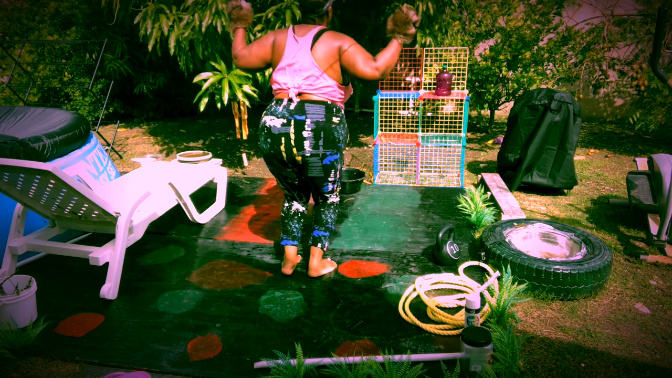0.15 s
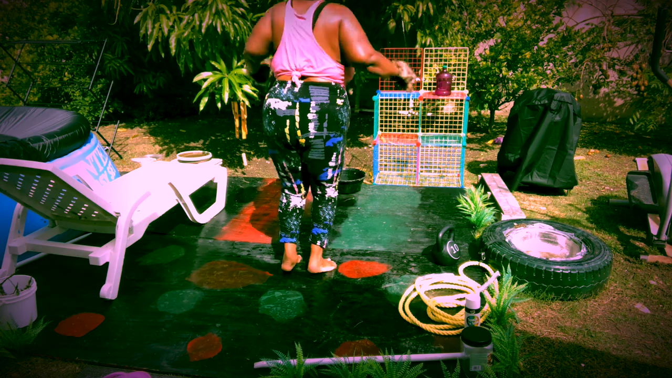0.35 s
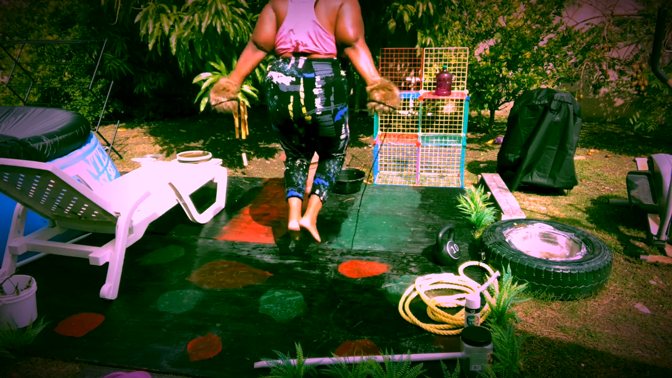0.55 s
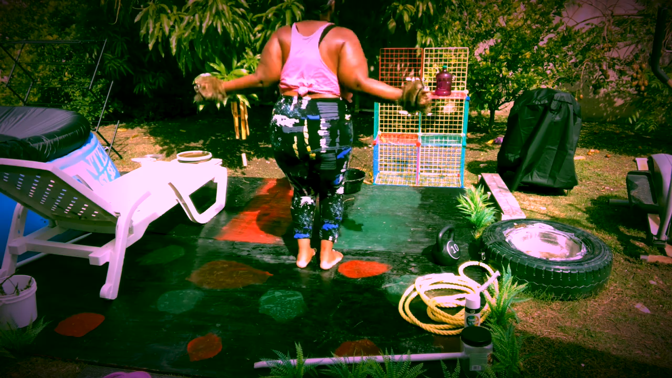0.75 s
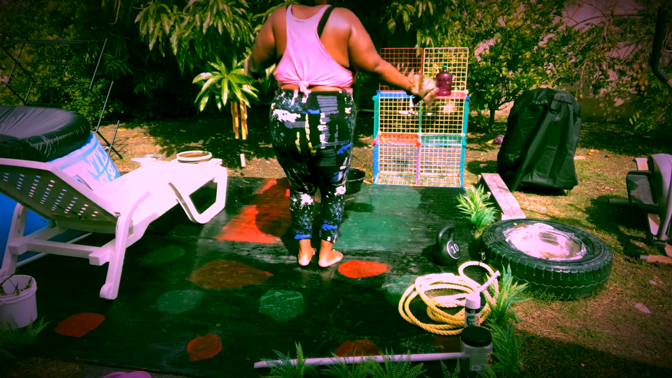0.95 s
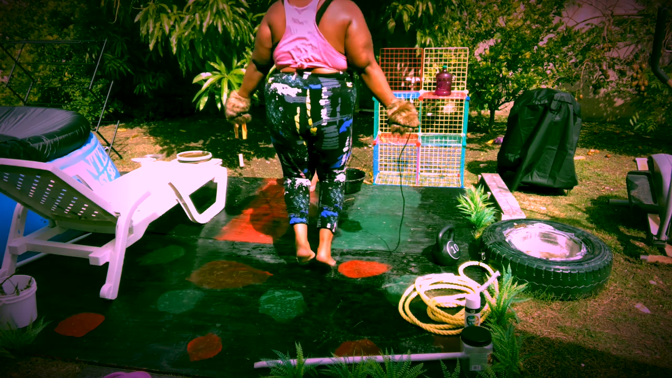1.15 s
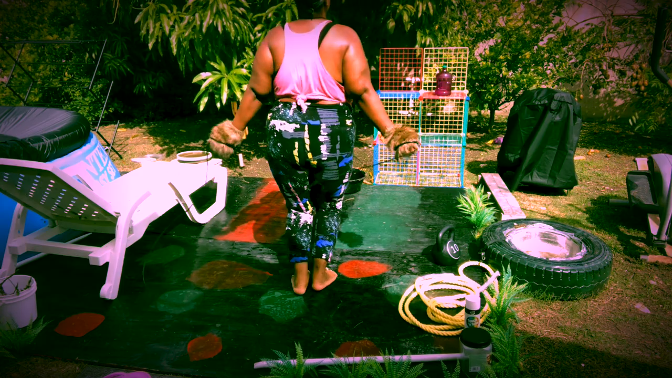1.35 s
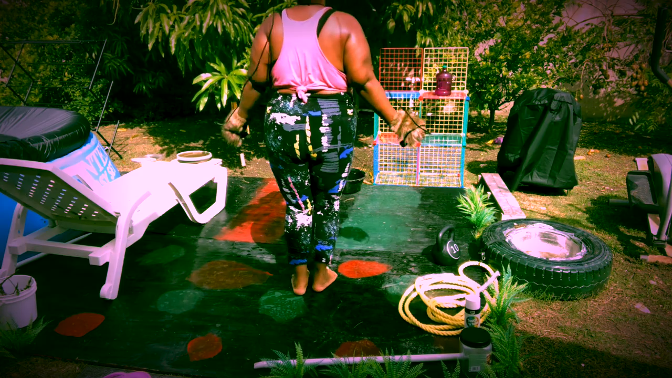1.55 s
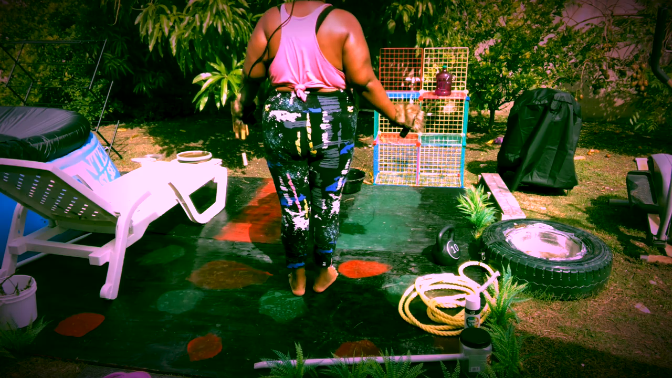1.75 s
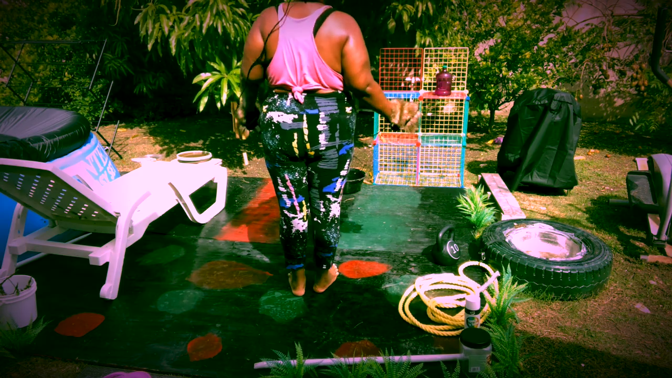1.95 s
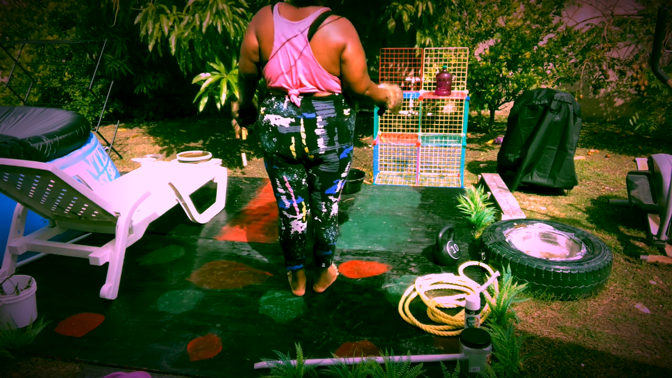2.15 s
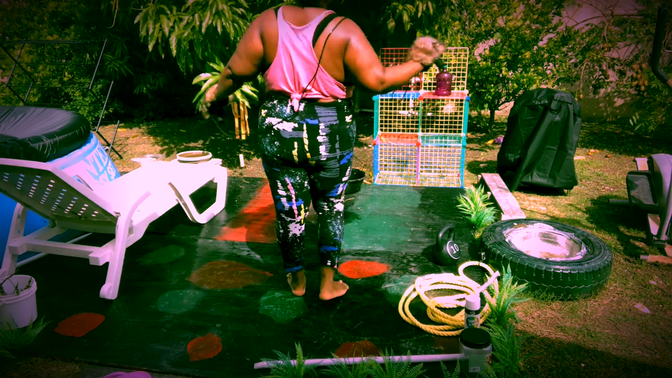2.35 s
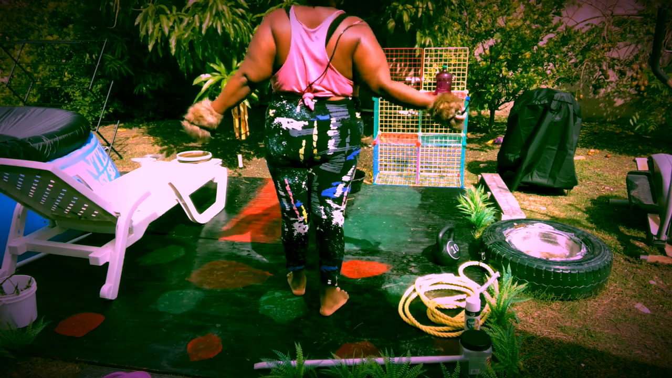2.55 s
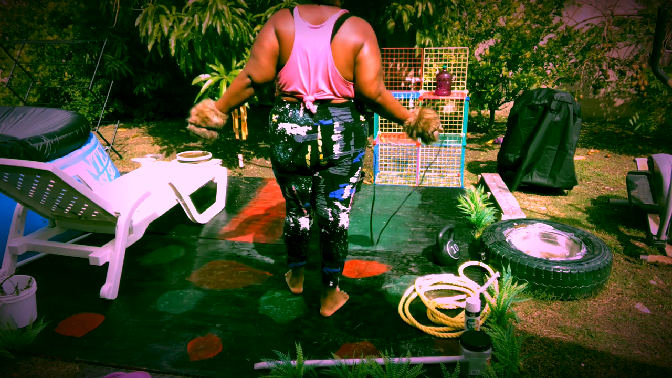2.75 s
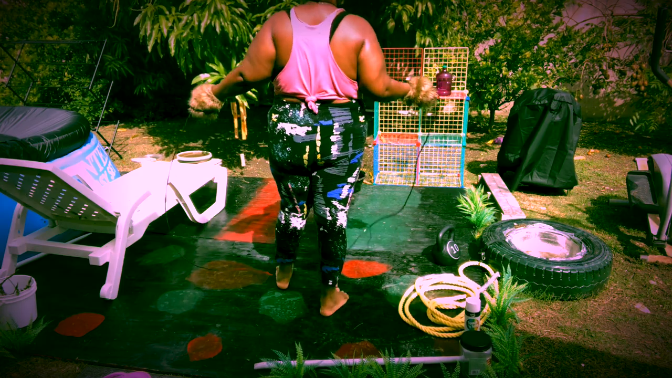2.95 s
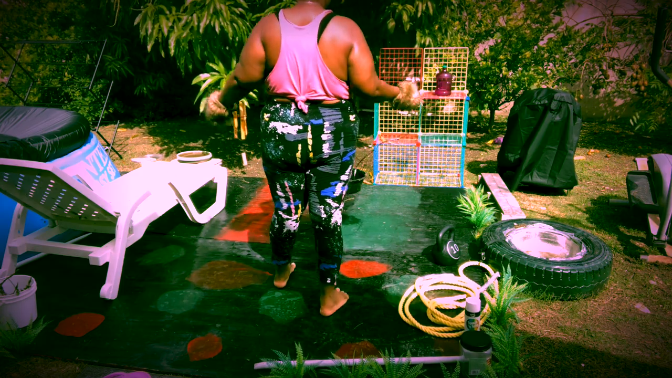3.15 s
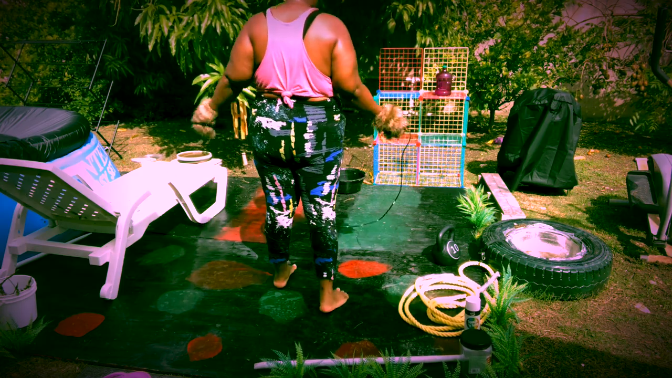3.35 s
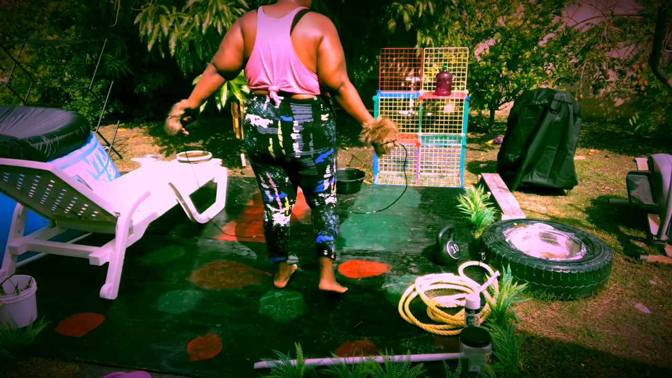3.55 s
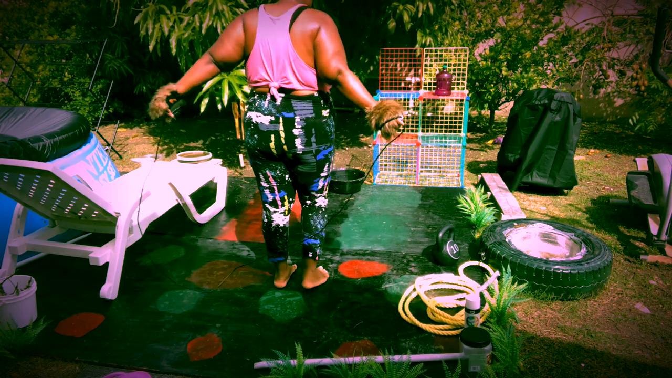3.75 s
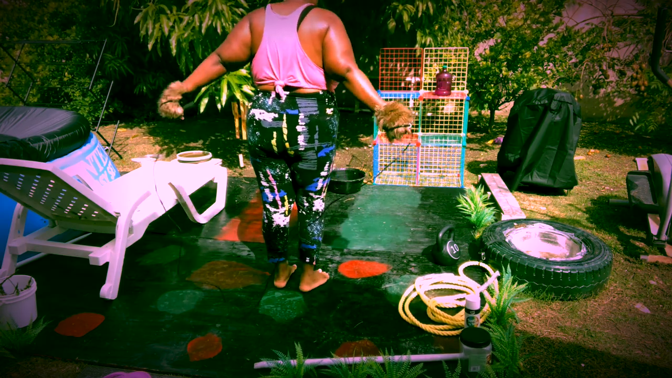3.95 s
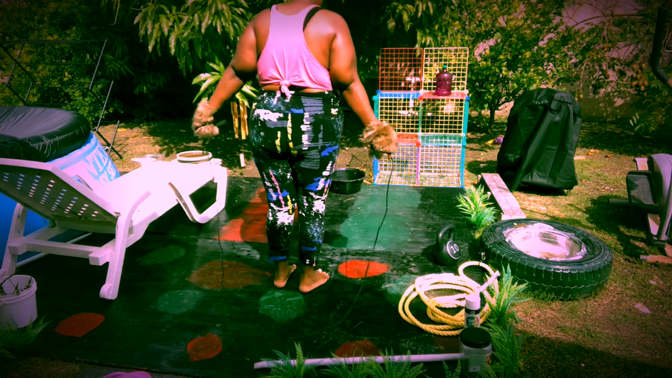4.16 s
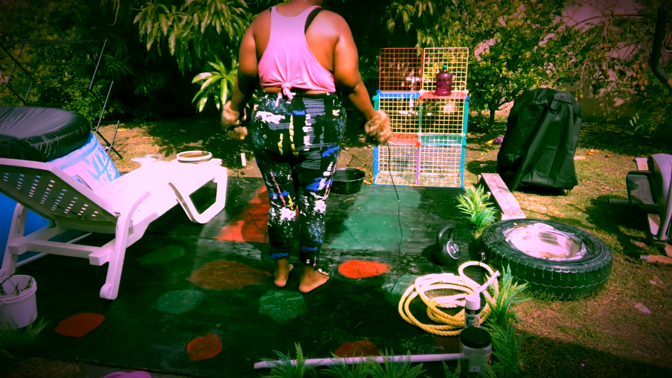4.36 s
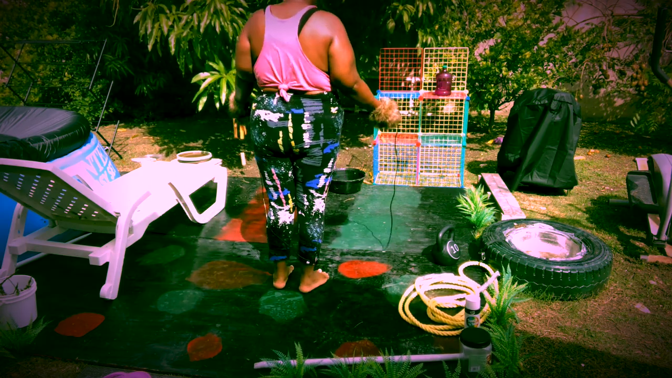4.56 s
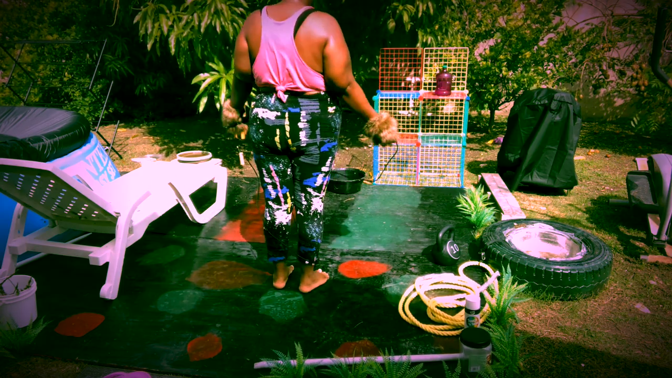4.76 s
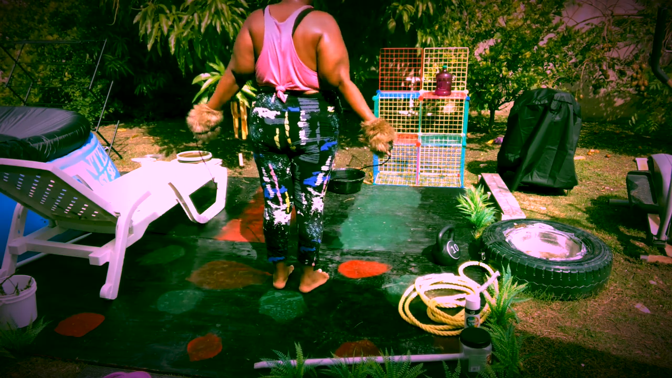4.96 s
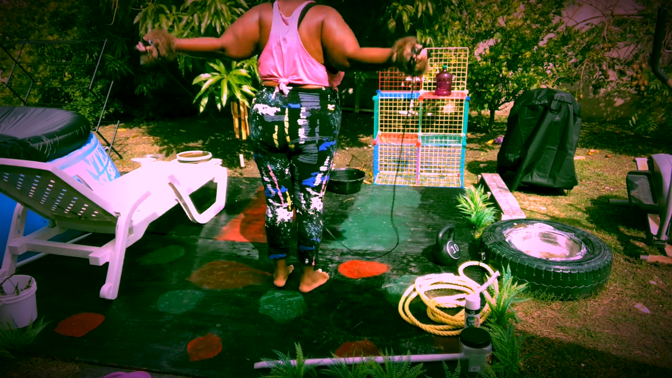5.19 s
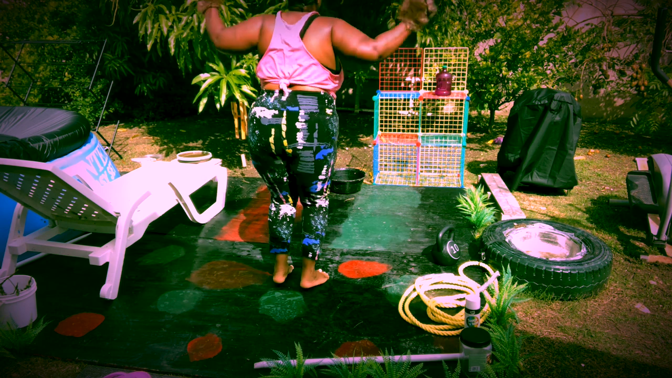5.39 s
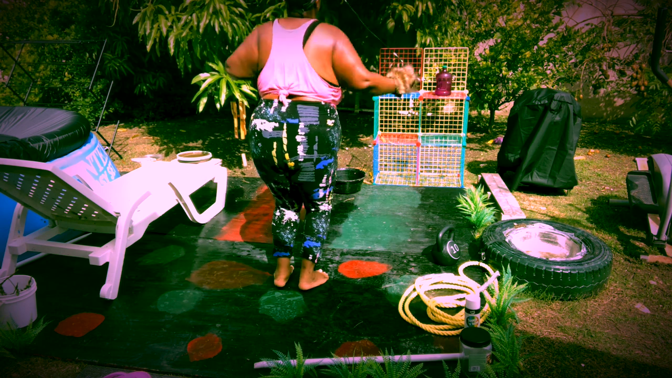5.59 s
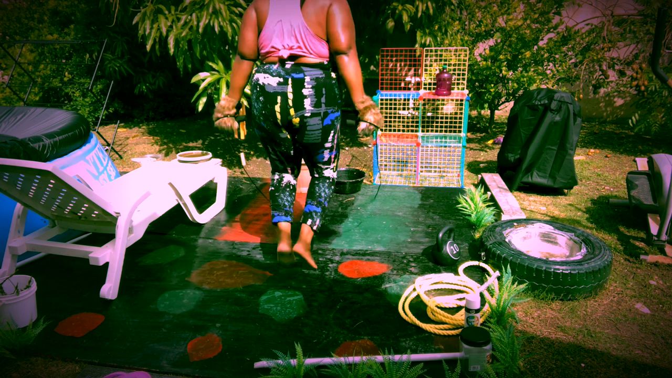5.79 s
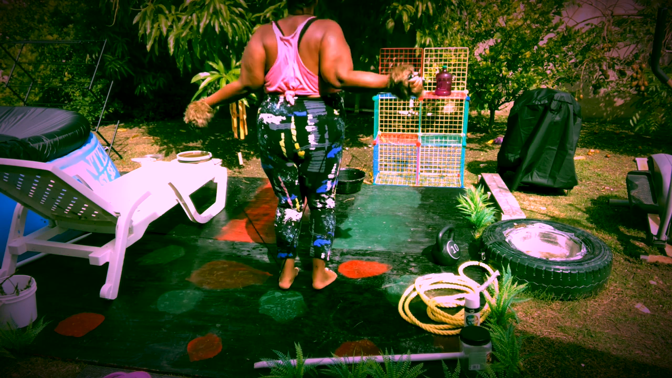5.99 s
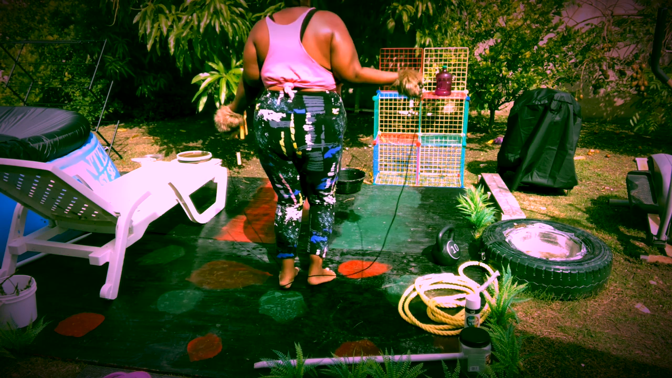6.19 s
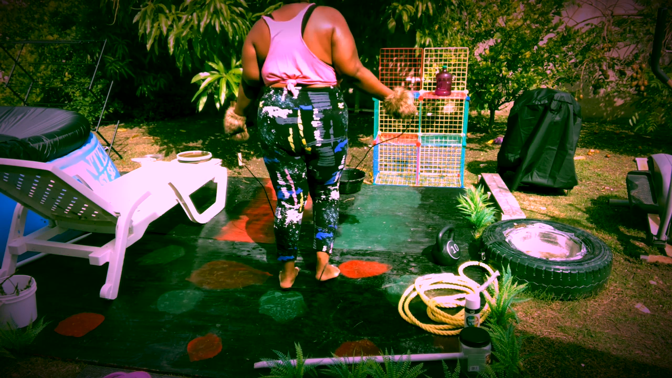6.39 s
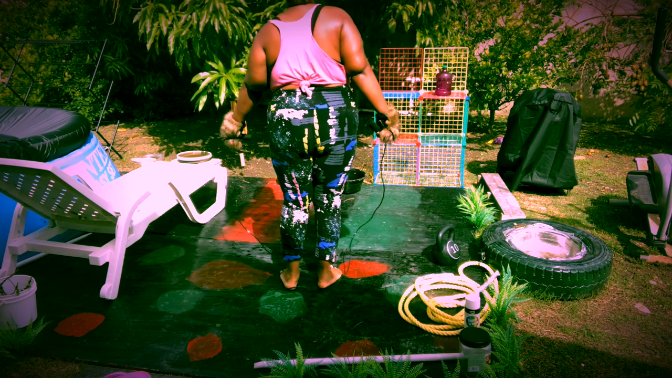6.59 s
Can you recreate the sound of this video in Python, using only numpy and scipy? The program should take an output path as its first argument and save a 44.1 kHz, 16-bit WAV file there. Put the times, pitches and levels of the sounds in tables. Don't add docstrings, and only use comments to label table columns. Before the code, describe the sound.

A thin rope cracks sharply on a wet garden mat while bare feet land with hollow knocks and rattles, over low traffic and leaves.

```python
import sys
import numpy as np
from scipy import signal
from scipy.io import wavfile
from scipy.ndimage import uniform_filter1d

SR = 44100
rng = np.random.default_rng(int(sys.argv[2]) if len(sys.argv) > 2 else 0)


def store_wav(level_fs):
    pcm = np.round(np.clip(np.atleast_2d(level_fs), -1, 1) * 32767)
    wavfile.write(sys.argv[1], SR, pcm.T.astype(np.int16))


def volts(x):
    e = np.asarray(x, float) / 20
    return 10 ** e


N = 292383


def evened(x):
    return x / np.sqrt(np.mean(x ** 2) + 1e-20)


def read(points, hz):
    f, value = np.transpose(points)
    return np.interp(np.log(hz + 1), np.log(f + 1), value)


def add(mix, s, sound):
    part = mix[round(s * SR):][:len(sound)]
    part += sound[:len(part)]


def colour(points):
    level_db = read(points, abs(np.fft.fftfreq(4096, 1 / SR)))
    log_gain = np.log(volts(np.maximum(level_db, -100)))
    return np.fft.ifft(np.exp(signal.hilbert(log_gain).conj())).real[:2048]


def tinted(x, points):
    return evened(signal.oaconvolve(x, colour(points))[:len(x)])


def resonate(x, hz, width_hz):
    turn = np.exp(2j * np.pi * hz * np.arange(len(x)) / SR)
    r = np.exp(-np.pi * width_hz / SR)
    return 2 * (turn * signal.lfilter([1 - r], [1, -r], x / turn)).real


def grains(per_s, spread_db):
    spread = np.minimum(rng.exponential(1, N), 4)
    size = volts(spread_db * spread) * rng.standard_normal(N)
    return size * (rng.random(N) < per_s / SR)


def stroked(rows, main, second, dulling_db_per_s=0):
    out, t = np.zeros(N), np.arange(N) / SR
    for s, level_db, rise_s, fall_s, rel_db in rows:
        start = max(round((s - 2.5 * rise_s) * SR), 0)
        at = slice(start, round((s + 2.5 * fall_s) * SR))
        since_s = t[at] - s
        below_db = 20 * np.maximum(since_s / fall_s, -since_s / rise_s)
        layers = main[at] + volts(rel_db + dulling_db_per_s * since_s) * second[at]
        out[at] += volts(level_db - below_db) * layers
    return out


def jolted(rows):
    rise_s = 0.0047
    return [(s, db, rise_s, fall_s, rel_db) for s, db, fall_s, rel_db in rows]


def garden():
    # f/Hz, density/dB per Hz
    floor = [(15, -67), (25, -39), (38, -5), (58, -6), (80, -4), (127, -9.5), (258, -9), (338, -13),
             (521, -14.5), (741, -18), (999, -20), (2880, -28), (4090, -27), (15000, -48.5), (16300, -59)]
    # t/s, level/dB
    leaves = [(0.0, -56), (0.66, -54), (0.9, -60), (1.22, -55), (1.4, -57.5), (2.55, -56.5), (5.26, -59),
              (5.74, -57), (5.93, -45), (6.2, -65.5), (6.63, -54.5)]
    # t/s, level/dB
    motor = [(0.0, -63), (0.48, -33), (0.7, -59), (1.27, -54), (1.42, -33), (2.1, -37.5), (2.31, -38.5),
             (2.9, -36), (3.42, -35.5), (5.58, -36.5), (5.8, -66), (6.63, -46)]
    # f/Hz, gain/dB
    ripples = [(2200, .5), (3100, -1.5), (4200, .5), (5600, 0.5), (7600, 1.5), (8800, 0), (11500, 0),
               (15500, 2)]
    floor_db, hum_hz, hum_width_hz = -43.06, 75.44, 3.4
    frames, hz = N // 256 + 5, np.fft.rfftfreq(1024, 1 / SR)
    a, b, patches = rng.standard_normal((frames, 513, 3)).T
    patches = evened(uniform_filter1d(uniform_filter1d(patches, 10, 0), 12, 1))
    leaves_db = np.interp(np.arange(frames) * 256 / SR, *np.transpose(leaves))
    leaf_band = np.exp(-((hz - 4000) / 2500) ** 2)[:, None]
    rustle_db = leaf_band * (leaves_db - leaves_db.mean())
    z = (a + 1j * b) * volts(1.1 * patches + 1.1 * rustle_db + read(ripples, hz)[:, None])
    wash = tinted(signal.istft(z, nperseg=1024, noverlap=768)[1][:N], floor)
    hum = resonate(rng.standard_normal(N), hum_hz, hum_width_hz)
    hum = evened(resonate(hum, hum_hz, hum_width_hz))
    hum_db = np.interp(np.arange(N) / SR, *np.transpose(motor)) - 11.5
    return volts(floor_db) * wash + volts(hum_db) * hum


def squeaks():
    # t/s, length/s, start f/Hz, end f/Hz, level/dB
    notes_heard = [
        (.654, .044, 780, 480, -30.5),
        (1.3, .11, 4330, 4280, -41),
        (5.918, .03, 850, 760, -45),
        (5.905, .03, 3800, 3700, -46),
        (2.825, .025, 4200, 4350, -53),
        (4.01, .06, 4350, 4250, -55),
        (4.145, .022, 3560, 3440, -51),
    ]
    out = np.zeros(N)
    for s, length_s, start_hz, end_hz, db in notes_heard:
        t, fuzz = np.arange(0, length_s, 1 / SR), 1.2e-4 * start_hz
        flutter = uniform_filter1d(uniform_filter1d(rng.standard_normal(6000), 160), 160)
        flutter = evened(flutter)[:len(t)]
        turns = np.cumsum(start_hz + (end_hz - start_hz) * t / length_s) / SR
        swell = np.sin(np.pi * (t / length_s) ** 0.73) ** 2
        add(out, s, volts(db) * (1 - fuzz + fuzz * flutter) * np.sin(2 * np.pi * turns) * swell)
    return out


def wet_hiss():
    # f/Hz, density/dB per Hz
    hiss = [(1650, -39), (2800, -8), (4260, -9.5), (5090, -1), (6590, -9.5), (8530, -19.5), (9810, -25),
            (11800, -21.5), (15400, -38.5), (16300, -52)]
    return tinted(grains(9000, 1.5), hiss)


def cage():
    shakes = [
        (0.722, -42, .07, -2),
        (1.268, -44.5, .19, 7.5),
        (6.02, -48, 0.34, 9.5),
        (6.09, -52, -0.04, 12),
    ]
    # f/Hz, width/Hz, level/dB
    wire_modes = [(800, 41, -1), (1115, 34, -0.5), (1330, 86, -2), (1568, 29.4, -1.5), (1915, 38, -4),
                  (1990, 36, -2), (2410, 150, -3), (2570, 60, -8), (3120, 160, -6), (4250, 67, -20),
                  (4850, 70, -20)]
    jolts, wires = grains(700, 2.), np.zeros(N)
    for hz, width_hz, db in wire_modes:
        wires += volts(db) * evened(resonate(resonate(jolts, hz, width_hz), hz, 3 * width_hz))
    return stroked(jolted(shakes), wet_hiss(), evened(wires))


def scuffs():
    drags = [(0.433, -45, .015, .04, -2), (0.455, -35, .03, .02, -1), (0.547, -51, .004, .005, 8),
             (0.694, -37, .002, .004, -3), (0.701, -34, .006, .022, 3), (0.73, -42, .004, .006, -8),
             (0.814, -50, .035, .035, 3), (0.95, -49, .06, .06, -4), (1.052, -36, .016, .028, -10),
             (1.242, -41, .005, .006, -10), (1.252, -32, .01, .009, -4), (1.635, -53, .03, .2, -1),
             (2.232, -43, .02, .06, 0), (2.416, -44, .008, .016, -8), (2.72, -60, .1, .4, 8),
             (2.83, -56, .02, .08, 0), (3.558, -48, .022, .025, -2), (3.779, -44, .014, .026, 3),
             (4.175, -57, .03, .06, 5), (4.376, -55, .08, .1, -5), (5.748, -33, .035, .022, 0),
             (5.976, -40, .006, .04, 12), (6.436, -53, .022, .028, -2), (6.596, -48, .07, .07, 0)]
    # f/Hz, density/dB per Hz
    body = [(400, -23.5), (800, -9), (1200, -3), (1600, -2), (2000, 0.5), (2400, 0), (3000, -20),
            (4200, -29)]
    return stroked(drags, wet_hiss(), tinted(grains(5000, 2.3), body))


def rattle():
    rattles = [(0.453, -27, .1, -3), (0.717, -24, 0.19, -4), (1.264, -18.5, 0.28, -1),
               (1.497, -31, -0.17, -13), (4.556, -37, 0.13, -17), (5.753, -28.5, .07, -2.5),
               (5.82, -39, 0.44, 6), (5.855, -40, 0, 5), (5.986, -10.5, .045, -9.5), (6.026, -21, .3, -2.5),
               (6.09, -23, -0.09, -9), (6.302, -45.5, 0.6, -11)]
    # f/Hz, width/Hz, level/dB
    low_modes = [(99, 92, -9), (181, 65, -4.5), (244.2, 24, 3), (341, 26.3, 1.5), (489, 68, -8.5)]
    # f/Hz, width/Hz, level/dB
    upper_modes = [(592, 56, 13), (852, 222, 2), (1150, 680, -12), (1620, 290, -2), (2040, 120, -36)]
    bumps = signal.oaconvolve(grains(1500, 0.43), np.hanning(24))[:N]
    layers = []
    for modes in (low_modes, upper_modes):
        ring = np.zeros(N)
        for hz, width_hz, db in modes:
            ring += volts(db) * resonate(resonate(bumps, hz, width_hz), hz, 2 * width_hz)
        layers.append(ring / np.sqrt(abs(uniform_filter1d(ring ** 2, 1200)) + 1e-20))
    return volts(-3.0) * stroked(jolted(rattles), *layers, dulling_db_per_s=-110)


def feet():
    # t/s, peak/dB, f/Hz
    knocks = [(0.445, -25, 299), (0.7037, -1.5, 312), (0.718, -12, 344), (0.749, -17, 259),
              (0.77, -23, 241), (0.809, -34, 242), (1.058, -35, 265), (1.242, -20, 316), (1.251, 0.5, 238),
              (1.269, -10, 285), (1.305, -6.5, 296), (1.333, -11, 255), (1.37, -14, 265),
              (1.386, -22, 259.8), (1.41, -26, 250), (1.497, -27, 290), (2.418, -34, 188),
              (4.534, -21.5, 280), (5.745, -21.5, 295), (5.976, 1, 255), (6.014, -26, 175),
              (6.048, -19, 266), (6.085, -10, 340), (6.099, -8, 312), (6.114, -18, 244), (6.139, -22, 269),
              (6.159, -25, 263), (6.225, -29, 290.6), (6.287, -20.5, 292), (6.427, -29.5, 304)]
    # t/s, peak/dB, f/Hz, edge re tap/dB
    taps = [(0.446, -18.5, 506, -11), (0.694, -20, 374, -23), (0.718, -23, 463, -7),
            (0.734, -22.5, 493, -6.5), (0.759, -28, 463, -24), (1.255, -13, 800, -9),
            (1.254, -3, 446, -11.5), (1.2703, -19, 460, 5), (1.2973, -13.5, 460, -4), (1.391, -32, 530, -8),
            (1.493, -34, 493, -14), (5.7472, -22, 563, 0.5), (5.973, -13, 445, -33),
            (6.021, -16.5, 676, -11), (6.039, -16, 453, -25), (6.064, -18, 650, -17),
            (6.089, -17, 502, -23), (6.226, -43, 545, -8), (6.284, -28.5, 506, -10), (6.314, -28, 343, -16),
            (6.334, -35, 793, -13)]
    # t/s, peak/dB, f/Hz
    thuds = [
        (0.708, -21.5, 184),
        (0.738, -29, 167),
        (1.255, -21.5, 99.5),
        (5.977, -8.5, 180),
        (5.977, -18, 92.7),
        (6.008, -18.5, 137.6),
        (6.048, -32, 125.6),
        (6.349, -49, 81.6),
        (6.599, -36, 80.7),
    ]
    knock_edge_db, thud_edge_db = -27, -40
    out, t = np.zeros(N), np.arange(9000) / SR
    falling_hz = 600 + 1000 * np.exp(-t / .0014)
    edge = np.sin(2 * np.pi * np.cumsum(falling_hz) / SR)
    edge *= (t / .0009) ** 2 * np.exp(2 - 2 * t / .0009)
    blows = [(*k, knock_edge_db) for k in knocks] + taps + [(*k, thud_edge_db) for k in thuds]
    for s, peak_db, hz, edge_db in blows:
        t60_s = (7.5 - .5 * peak_db) / hz
        sagging = np.cumsum(hz * (1 + 0.4 * np.exp(-t * hz / 0.63))) / SR
        soft_start = (1 - np.exp(-t * hz / 0.69)) ** 2
        ring = np.sin(2 * np.pi * sagging) * soft_start * volts(-60 * t / max(t60_s, .01))
        add(out, s, volts(peak_db + 5.5) * ring + volts(peak_db + edge_db + 3) * edge)
    return out


def echoes(size):
    # f/Hz, density/dB per Hz
    tail_spectrum = [(120, -10), (200, 0.5), (367, -0.5), (493, 4.5), (841, -2.5), (1520, -5), (1730, -6),
                     (2070, -6), (2790, -11), (4330, -8), (11100, -24.5), (14100, -36), (16300, -38.5)]
    # f/Hz, t60/s
    walls = [(250, 0.26), (600, 0.073), (1500, 0.16), (4000, 0.31), (14000, 0.2)]
    hz, t, z = signal.stft(rng.standard_normal(size), SR, nperseg=128)
    hz = hz[:, None]
    patches = uniform_filter1d(uniform_filter1d(rng.standard_normal(z.shape), 4, 0), 3, 1)
    scatter = 3.3 * np.exp(-t / 0.0052) * np.exp(-((hz - 4500) / 2500) ** 2)
    late_bass = 1 - np.exp(-t * (hz + 100) / 1.33)
    z = z * volts(-60 * t / read(walls, hz) + 2.6 * evened(patches)) * (1 + scatter) * late_bass
    tail = signal.istft(z, SR, nperseg=128)[1][:size]
    tail = tinted(tail * (1 - np.exp(-np.arange(size) / SR / 0.0007)), tail_spectrum)
    return tail / np.sqrt(np.mean(tail[:400] ** 2))


def rope():
    # t/s, peak/dB, mat thump re crack/dB, echo tail re crack/dB, treble tilt/dB
    cracks = [(0.5693, -5, -19.5, -14, -1), (0.6995, -23, -4, -16, 17.5), (1.1294, 0, -21.5, -18.5, -1),
              (1.1892, -17, -42, -12.5, 2), (1.1944, -19.5, -14, -29, -13), (1.2086, -41, -4, -24, -4),
              (2.4134, -30.5, -6, -9.5, -17), (2.711, -44, -1, -9, 1), (2.9557, -42.5, -9, -12, 2),
              (4.5365, -15.5, -14.5, -11.5, -7.5), (5.8188, -39, -11, -12, 3),
              (5.8416, -4.5, -11, -13.5, 8), (5.9353, -39, -6, -14, 17), (5.972, -28.5, -3, -8, 6),
              (6.3157, -15, -23, -17, -5.5), (6.5364, -34, -1.5, -8, -17)]
    # f/Hz, density/dB per Hz
    snap_spectrum = [(880, -27), (1500, -19), (2570, -7.5), (5070, 6.5), (7950, -9), (9050, -20),
                     (11500, -19), (13400, -26), (15100, -24), (16300, -63)]
    swish_re_tail_db = -5.5
    out, t = np.zeros(N), np.arange(900) / SR
    snap = colour(snap_spectrum)[:900]
    falling_hz = 450 + 2600 * np.exp(-t / .001)
    thump = np.sin(2 * np.pi * np.cumsum(falling_hz) / SR)
    thump *= (1 - np.exp(-t / .0008)) * np.exp(-t / .0032)
    for s, peak_db, thump_db, tail_db, treble_db in cracks:
        swish = evened(resonate(resonate(rng.standard_normal(900), 2500, 1800), 2450, 1800))
        swish *= np.exp((t - t[-1]) / 0.0029)
        add(out, s - t[-1], volts(peak_db + tail_db + swish_re_tail_db) * swish)
        crack = volts(tail_db) * echoes(size=15000)
        add(crack, 0, volts(7.5) * snap / abs(snap).max())
        facing = colour([(3000, 0), (6000, 0.41 * treble_db), (13000, treble_db)])[:256]
        add(out, s + .0008, volts(peak_db) * signal.oaconvolve(crack, facing))
        add(out, s + 0.000782, volts(peak_db + thump_db + 11.0) * thump)
    return out


def scene():
    return (garden() + squeaks() + cage() + scuffs() + rattle() + feet() + rope())[None]


def low_pass(x):
    return signal.sosfilt(signal.butter(12, 16470, fs=SR, output="sos"), x)


def record(dry):
    dry = signal.sosfilt(signal.butter(2, 38, "high", fs=SR, output="sos"), dry)
    threshold_db, recovery_db_per_s, lag_s = -31.0, 19.5, 0.0097
    power_db = 10 * np.log10(abs(uniform_filter1d(dry[0] ** 2, 900)) + 1e-12)
    fall_db = np.arange(N) * recovery_db_per_s / SR
    held_db = np.maximum.accumulate(power_db + fall_db) - fall_db
    over_db = np.maximum(held_db - threshold_db, 0)
    lag = np.exp(-1 / (lag_s * SR))
    ducked = dry / volts(0.15 * signal.lfilter([1 - lag], [1, -lag], over_db))
    band = signal.firwin(255, 16250, fs=SR)
    finished = signal.oaconvolve(np.clip(ducked, -1, 1), band[None], "same")
    return low_pass(finished)


dry = scene()
out = record(dry)
store_wav(out)
```